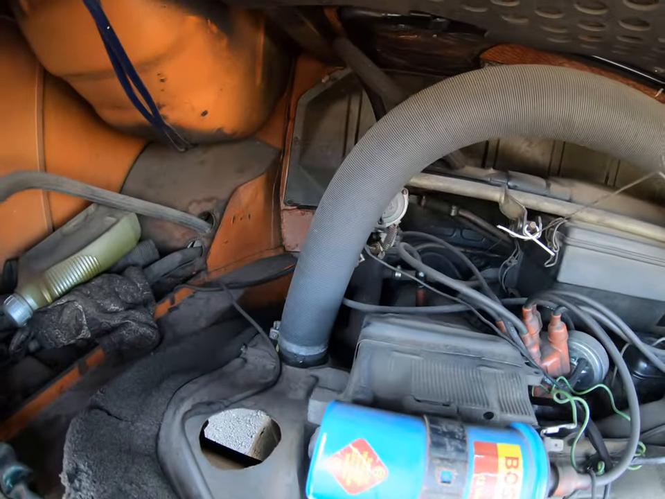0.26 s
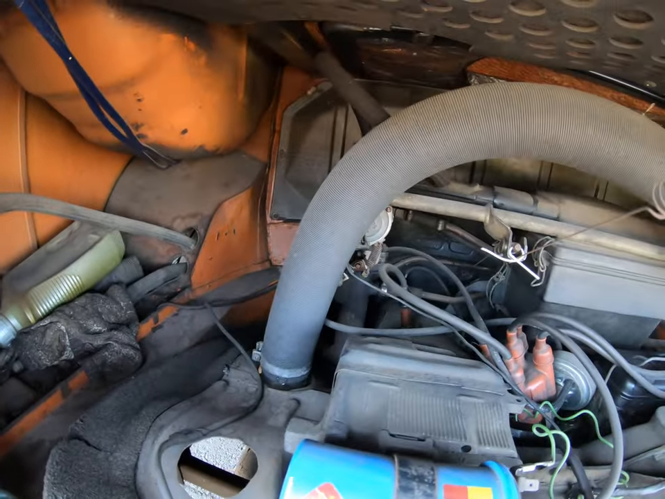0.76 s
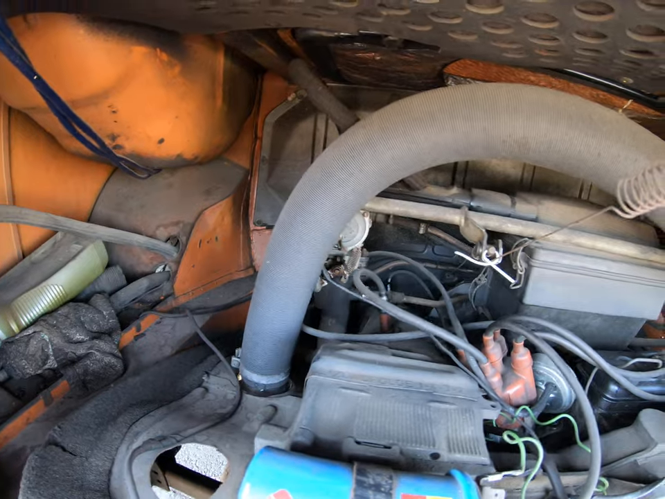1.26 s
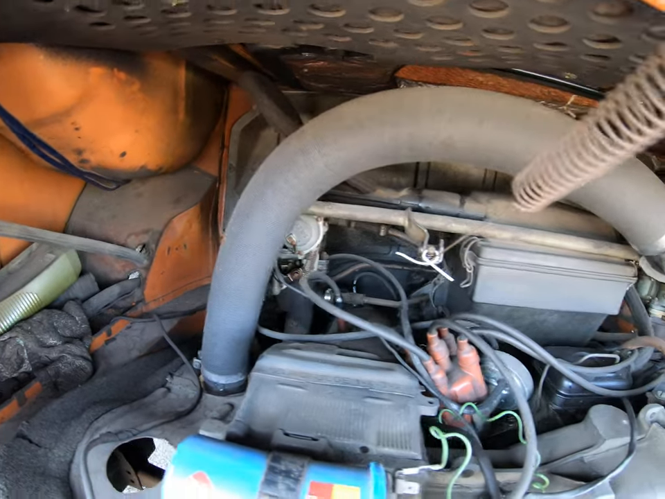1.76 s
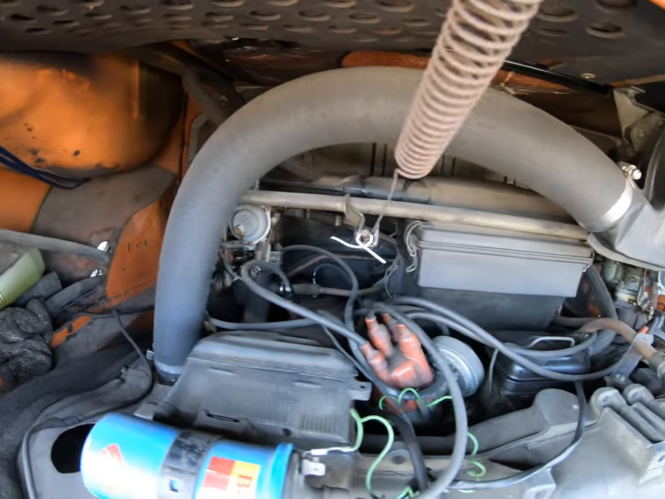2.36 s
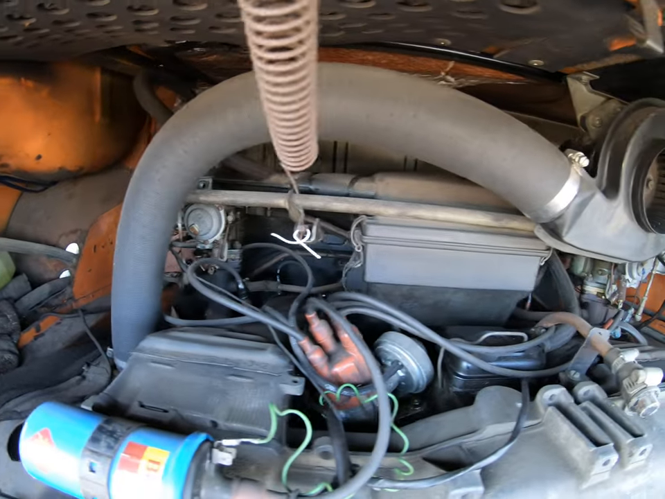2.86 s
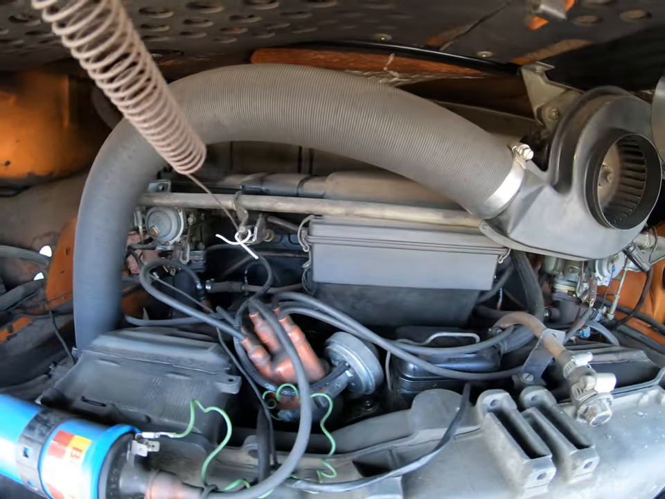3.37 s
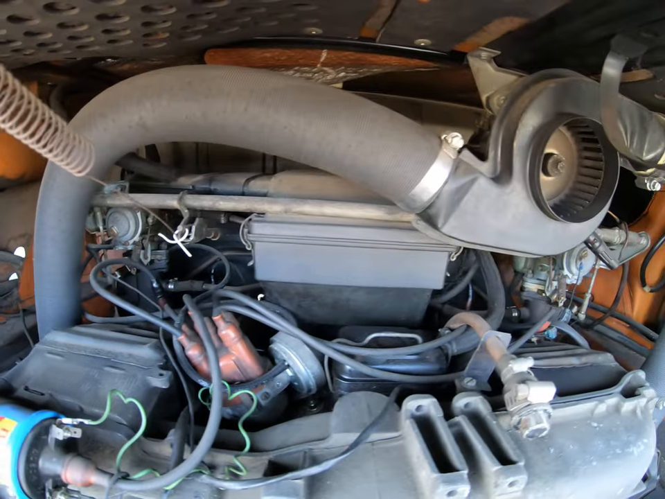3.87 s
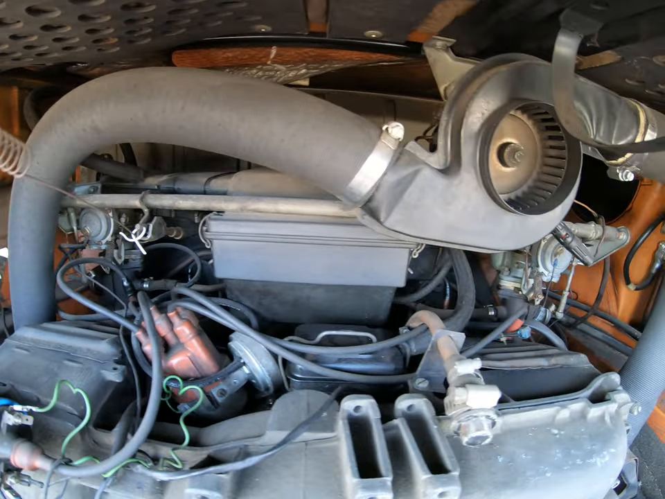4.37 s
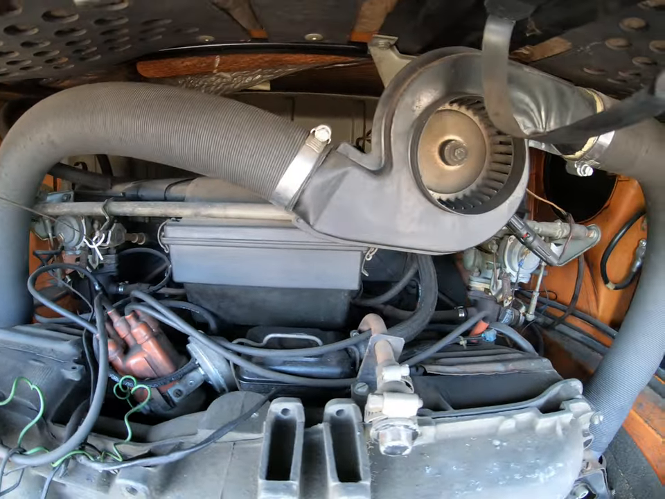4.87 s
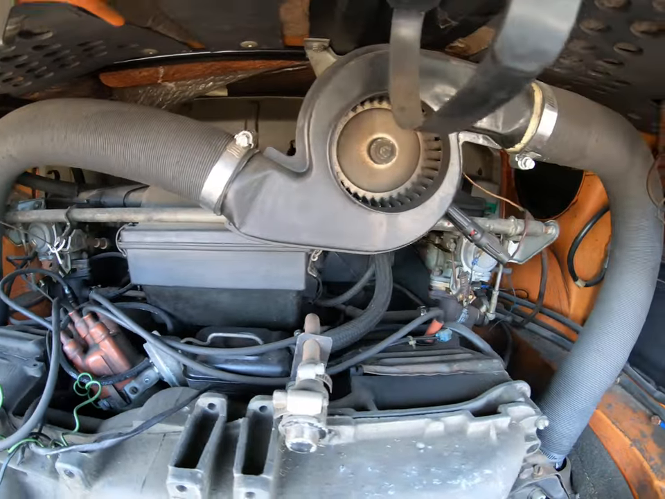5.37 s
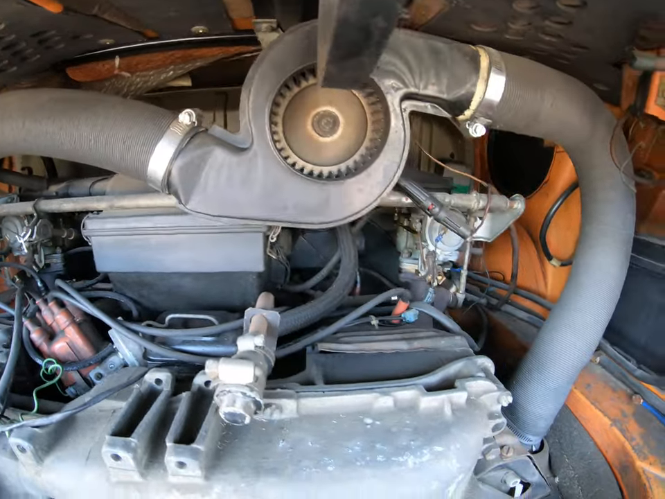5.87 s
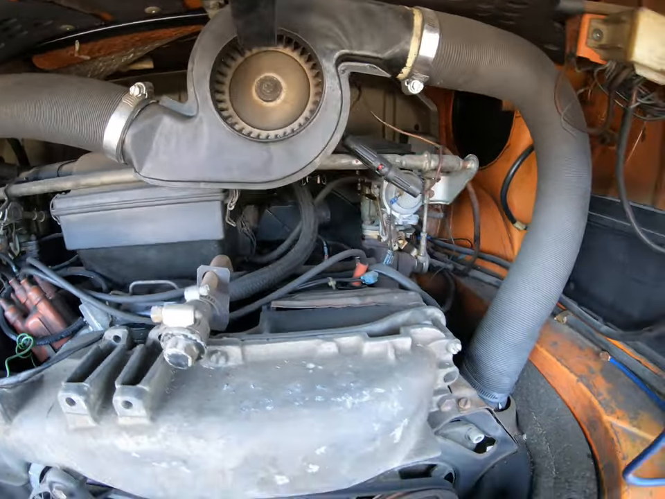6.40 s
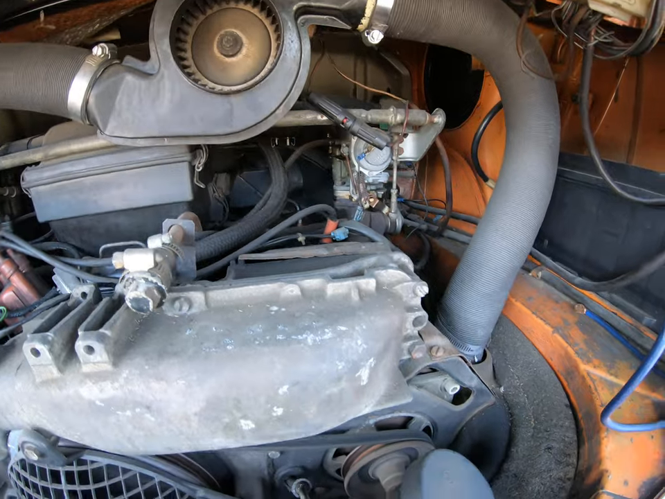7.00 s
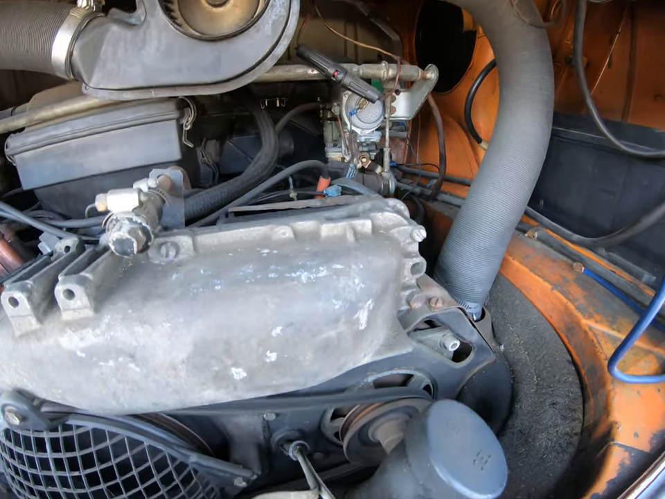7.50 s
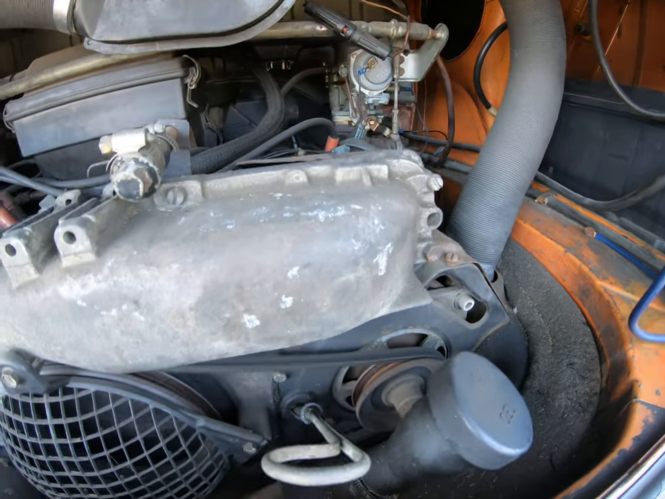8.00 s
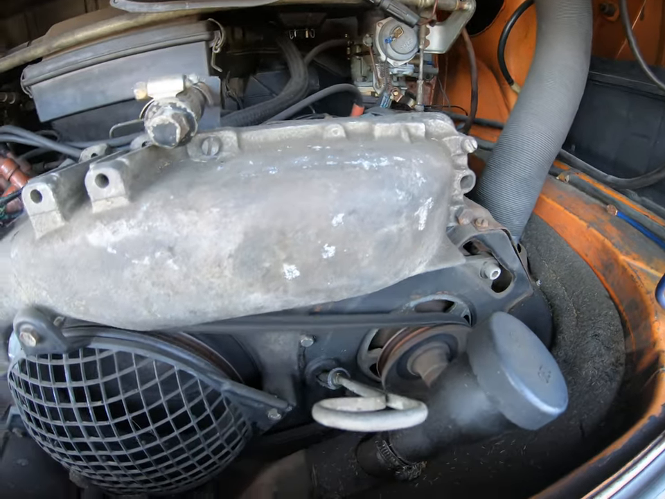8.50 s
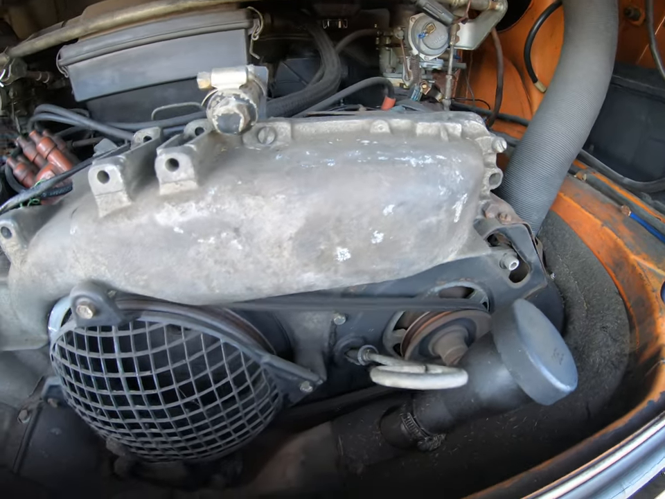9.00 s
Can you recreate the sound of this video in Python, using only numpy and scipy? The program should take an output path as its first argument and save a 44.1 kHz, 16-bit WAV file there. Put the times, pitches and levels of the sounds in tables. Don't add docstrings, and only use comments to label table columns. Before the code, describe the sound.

Continuous close idle in an open engine bay: rounded exhaust and intake pulses throb quickly, with rumbling gas flow behind. Valve gear clatters and ticks in a repeating pattern, while a bladed cooling fan hums and air hisses above. The microphone pans slowly past the blower, the fan tone rising modestly midway, then settles over the far side with brighter ticking. No revving or stopping.

```python
import sys
import numpy as np
from scipy import signal
from scipy.fft import rfft, irfft
from scipy.io import wavfile
from scipy.ndimage import uniform_filter1d, map_coordinates

SR = 44100
rng = np.random.default_rng(int(sys.argv[2]) if len(sys.argv) > 2 else 0)


def output_pcm(signal):
    pcm = np.clip(np.atleast_2d(signal).T, -1, 1) * 32767
    wavfile.write(sys.argv[1], SR, np.round(pcm).astype(np.int16))


def linear_from_db(decibels):
    return 10 ** (np.asarray(decibels, float) / 20)


N = 407925
STEP = 64


def in_time(rows):
    time_s, *columns = np.transpose(rows)
    return [np.interp(np.arange(N) / SR, time_s, column) for column in columns]


def at_hz(points, hz):
    point_hz, value = np.transpose(points)
    return np.interp(np.log(hz), np.log(point_hz), value)


def drift(rate_hz):
    knots = rng.standard_normal(int(N / SR * 2 * rate_hz) + 5)
    return map_coordinates(knots, [np.linspace(1, len(knots) - 2, N // STEP + 1)], order=3)


def held(slow):
    return slow.repeat(STEP)[:N]


def panned(x, pan_db):
    return x * linear_from_db(pan_db / 2 * np.array([[1], [-1]]))


def crossing(across, near, far):
    return near + (far - near) * across


# time in seconds, four-stroke cycles per second.
SPEED = [(0, 12.846), (.63, 13.04), (.93, 12.974), (2.61, 13.033), (2.92, 13.099), (3.33, 13.231),
         (3.92, 13.204), (4.25, 13.113), (4.67, 13.103), (5.29, 13.327), (5.55, 13.25), (5.96, 13.28),
         (6.29, 13.241), (6.82, 13.35), (7.23, 13.266), (8.21, 13.434), (8.8, 13.31), (9.25, 13.37)]
START_CYCLES = -.0696


def crank():
    return START_CYCLES + np.cumsum(in_time(SPEED)[0]) / SR


# crank degrees, peak in dB, width in degrees.
PULSES = [
    (41.5, -17.3, 14.9),
    (83.1, 4.5, 58.7),
    (161.9, -0.7, 24.8),
    (229.2, 5.1, 30.9),
    (309.2, 3.5, 34.8),
    (408.2, -2.6, 23.5),
    (455.1, -5.3, 19.6),
    (577.6, -8.4, 18.1),
    (663.2, -1.6, 24.6),
]


def gas_pulses(cycles):
    run_in_samples = 8192
    before = np.arange(run_in_samples, 0, -1) * SPEED[0][1] / SR
    run_in = np.r_[cycles[0] - before, cycles] + 3
    uneven = linear_from_db(0.29 * rng.standard_normal((int(run_in[-1]) + 2, len(PULSES))))
    pressure = 0
    for k, (degrees, peak_db, width_deg) in enumerate(PULSES):
        turns = run_in - degrees / 720 + .5
        off_peak_deg = (turns % 1 - .5) * 720
        hump = np.exp(-.5 * (off_peak_deg / width_deg) ** 2)
        pressure = pressure + linear_from_db(peak_db) * uneven[turns.astype(int), k] * hump
    radiated = signal.sosfilt(signal.butter(6, 37, "high", fs=SR, output="sos"), pressure)
    pipe_hz, pipe_gain = 159, .27
    pipe = signal.lfilter(*signal.iirpeak(pipe_hz, 9, fs=SR), radiated)
    return (radiated + pipe_gain * pipe)[run_in_samples:]


def tone(cycles, multiple, level_db, lag_rad, wobble_rad):
    phase = 2 * np.pi * (multiple * cycles + rng.random()) + wobble_rad * held(drift(2.2))
    return np.sqrt(2) * linear_from_db(level_db) * np.sin(phase - lag_rad / 2 * np.array([[1], [-1]]))


# multiple of the cycle rate, highest rms in dB,
# loudest at seconds, loss in dB per second away.
ORDERS = [(14, -34, 2.8, .4), (15, -41, 9, 1), (16, -33.5, 8.3, .1), (17, -37, 8.3, .8), (44, -39, 4.6, .7),
          (52, -35, 6.2, 3.5), (53, -40, 6.6, 1.5), (55, -34, .6, 1.5), (56, -31.5, 5.1, 3),
          (54, -40, 6, 2.5), (75, -41, 1.8, 3), (59, -37, 5.4, 5), (64, -38.5, 5.4, 5), (68, -37, 4.7, 4),
          (69, -40, 2.8, 2), (70, -40, 2.8, 1.5), (74, -38, 1.4, 4), (71, -42, 1.2, 2), (43, -40, 5, 1.5),
          (48, -41, 5, .5)]


def pipe_orders(cycles):
    time_s = np.arange(N) / SR
    out = 0
    for multiple, peak_db, at_s, loss in ORDERS:
        level_db = peak_db - loss * abs(time_s - at_s)
        out = out + tone(cycles, multiple, level_db, lag_rad=multiple / 60, wobble_rad=0.11)
    return out


# time in seconds, way across the bay 0-1, fan tone in dB.
WALK = [
    (0, 0.07, -35),
    (.4, 0.2, -32),
    (1.1, 0.2, -32),
    (3.0, 0.38, -28),
    (4.9, 0.5, -28),
    (6.3, 0.98, -31),
    (7.4, 0.9, -32),
    (8.3, 0.93, -34),
    (9.25, 0.83, -32.5),
]


def fan(cycles, across, fan_db):
    blades = tone(cycles, 40, fan_db + 0.1, lag_rad=0.24, wobble_rad=0.096)
    return panned(blades, crossing(across, -0.5, 5))


# crank degrees, dull knock in dB, bright tick in dB,
# top sizzle in dB, fading in degrees.
VALVES = [
    (55, 5.5, 9.5, 1.5, 46),
    (191, 1, 1, -8, 36),
    (376, -19, 1, 2.5, 70),
    (434, 5.5, 5.5, 6.5, 41),
    (602, 3, 2.5, -6, 28),
]


def contacts(cycles, column):
    power, angle = 1, np.arange(720)
    for row in VALVES:
        since = (angle - row[0]) % 720
        power = power + linear_from_db(2 * row[column]) * (1 - np.exp(-since / 7.0)) * np.exp(-since / row[4])
    degrees = cycles % 1 * 720
    return np.sqrt(power / np.mean(power))[degrees.astype(int)]


def repeating_noise(cycles, memory, size=2048):
    rows = rng.standard_normal((2, int(cycles[-1]) + 203, size))
    rows = signal.lfilter([np.sqrt(1 - memory ** 2)], [1, -memory], rows, axis=1)[:, 200:]
    orders = rfft(rows)
    rows = irfft(orders * (np.sqrt(size) / np.abs(orders)) ** .15, size)
    flat = rows.reshape(2, -1)[:, ((cycles + 1) * size).astype(int)]
    return flat * np.sqrt(SR / size / 12.1)


# Hz, share of power alike each cycle.
REPEATING = [(250, 0.46), (800, 0.68), (1500, 0.81), (3000, 0.84), (4300, 0.23), (6000, .03)]
# Hz, left-right likeness.
LIKENESS = [(60, 0.94), (130, 0.87), (290, 1), (640, 0.58), (1410, 0.15), (3100, 0.77), (6820, 0.19),
            (15000, -0.3)]


def bands(low_hz, high_hz, steps, level_db, free, locked, patchy_db):
    out, edges = 0, np.geomspace(low_hz, high_hz, steps + 1)
    for k, (low, high) in enumerate(zip(edges, edges[1:])):
        hz = np.sqrt(low * high)
        source = free[k % 2]
        if locked is not None:
            share = np.clip(at_hz(REPEATING, hz), 0, 1)
            source = np.sqrt(1 - share) * source + np.sqrt(share) * locked[k % 2]
        mid, side = signal.sosfilt(signal.butter(2, [low, high], "band", fs=SR, output="sos"), source)
        alike = np.clip(at_hz(LIKENESS, hz), -1, 1)
        gain = held(linear_from_db(level_db(hz) + patchy_db * drift(.8)))
        out = out + gain * (np.sqrt(1 + alike) * mid + np.sqrt(1 - alike) * side * [[1], [-1]])
    return out / uniform_filter1d(np.mean(out ** 2, axis=0), SR) ** .5


# Hz, dB per Hz.
CLATTER = [(230, 2), (300, -3), (460, -7), (700, -3.5), (1150, -7), (2350, -9), (2850, -5.5), (5200, -11.5)]
# Hz, lift in dB, strongest at seconds, reach in seconds, width in octaves.
BAY_WAVES = [(374, 3.5, 5.4, 1.3, 0.29), (545, 4, 5.5, 0.85, .15), (732, 4, 0.5, 0.84, 0.057),
             (810, 7, 5.56, 0.56, 0.23), (960, 2, 1.4, 1.2, 0.062), (900, -3, 8, 1.2, 0.13),
             (1110, -8, 9.5, 0.41, 0.043), (1240, 5.5, 8.5, 1.06, 0.32), (1170, -1.5, 0.62, 0.51, 0.1),
             (1600, -1, 6.4, 1, 0.068), (1750, 3, 0.17, 0.28, 0.12), (1900, -7.5, 2.2, 1.15, 0.078),
             (1990, 3, 8.6, 2.6, 0.14), (2590, 1.5, 7.8, 1.7, 0.14), (2760, 1.5, 1.6, 1.4, 0.065),
             (3350, 0.5, 4.7, 0.74, 0.45), (3180, -5, 7.6, 0.27, 0.11), (4170, 0.5, 0.4, 0.45, 0.24),
             (4780, -1, 2.6, 0.21, 0.061)]


def bay_colour(hz):
    time_s, level_db = np.arange(0, N, STEP) / SR, at_hz(CLATTER, hz)
    for wave_hz, lift_db, at_s, reach_s, octaves in BAY_WAVES:
        away = ((time_s - at_s) / reach_s) ** 2 + (np.log2(hz / wave_hz) / octaves) ** 2
        level_db = level_db + lift_db * np.exp(-.5 * away)
    return level_db


def clatter(cycles, across, free):
    locked = [repeating_noise(cycles, 0.98), repeating_noise(cycles, 0.94)]
    knock = contacts(cycles, 1) * bands(231.2, 2302, 22, bay_colour, free, locked, patchy_db=0.43)
    rattle = contacts(cycles, 2) ** .25 * bands(2300, 5200, 14, bay_colour, free, locked, patchy_db=1.1)
    return linear_from_db(-24) * panned(knock, crossing(across, -4.5, 2.1)) + linear_from_db(-27) * rattle


# Hz, struck at crank degrees, peak in dB, heard from seconds, until seconds.
ROCKERS = [(4750, 50, -30, -1, 1.5), (4750, 50, -30.5, 3.2, 5), (4750, 45, -27.5, 5.9, 10),
           (4060, 65, -21.5, 2.05, 2.95), (3720, 70, -23.5, 3.8, 4.6), (3720, 428, -25.5, 3.8, 4.6),
           (3760, 68, -23.5, 5, 7.1), (3720, 435, -24.5, 5.8, 7.1), (3320, 440, -24, 4.6, 6.4),
           (2850, 200, -23.5, .4, 2.2), (2850, 80, -25.5, .4, 2.2), (2800, 430, -25.5, .2, 2.2),
           (2880, 570, -26.5, .2, 2.2), (3000, 270, -25.5, 2, 3.1), (4270, 55, -25.5, 6.5, 10),
           (3600, 440, -23.5, 8, 10), (2700, 570, -25.5, 8, 10), (4090, 65, -23.5, 8, 9),
           (3200, 430, -25.5, 7.7, 10), (3550, 60, -26.5, .5, 2), (4270, 450, -27, 6.2, 10),
           (4200, 75, -26, 3.1, 4.8), (2900, 310, -24, 7.7, 10), (3600, 65, -27, 7.7, 10)]
# Hz, struck at crank degrees, peak in dB, heard from seconds, until seconds.
COVERS = [(2030, 590, -28, 5.9, 10), (1300, 45, -27, 7.8, 10), (1300, 600, -27, 7.8, 10),
          (960, 630, -21.5, -1, 3.4), (960, 270, -25, -1, 3.4), (1430, 250, -28, -1, 2.4),
          (800, 630, -21.5, 4.4, 6.1), (1050, 200, -25, 4.9, 6.1), (1265, 95, -23.5, 2.9, 5.9),
          (1520, 610, -25, 1.4, 3), (1680, 630, -28, -1, 1.4), (2060, 75, -28, 4.6, 7.5),
          (1360, 590, -28, 6.2, 7.8), (2000, 390, -30, 6.2, 10)]


def ticks(cycles, pan_db):
    fade_s, uneven_db, contact_q = .25, 1.1, 4
    out = np.zeros(N)
    turns = np.arange(int(cycles[-1]) + 1)
    for parts, t60_s in ((ROCKERS, .033), (COVERS, .06)):
        for hz, degrees, peak_db, start_s, end_s in parts:
            first, last = max(int((start_s - fade_s) * SR), 0), min(int((end_s + fade_s) * SR), N)
            slack = rng.integers(0, 10, len(turns))
            at = np.searchsorted(cycles, turns + degrees / 720) + slack
            heard = np.clip(np.minimum(at / SR - start_s, end_s - at / SR) / fade_s + .5, 0, 1)
            strength = heard * linear_from_db(peak_db + uneven_db * rng.standard_normal(len(at)))
            inside = (at >= first) & (at < last)
            clicks = np.full(last - first, 1e-18)
            clicks[at[inside] - first] = strength[inside]
            r, w = linear_from_db(-60 / (t60_s * SR)), 2 * np.pi * hz / SR
            ring = signal.lfilter([0, np.sin(w)], [1, -2 * r * np.cos(w), r * r], clicks)
            out[first:last] += 1.2 * signal.lfilter(*signal.iirpeak(hz, contact_q, fs=SR), ring)
    return panned(out, pan_db)


# Hz, dB per Hz.
HISS = [(2650, -30), (4500, 0), (4790, -11), (5280, -6.5), (6390, -5), (7270, -7), (9030, -17),
        (10200, -18.5), (11500, -36), (13800, -32.5), (15400, -66)]


def air_hiss(cycles, across, pan_db, free):
    def air(hz):
        return at_hz(HISS, hz)
    hiss = contacts(cycles, 2) * bands(5000, 8800, 8, air, free, None, patchy_db=.7)
    sizzle = contacts(cycles, 3) * bands(9090, 14100, 6, air, free[::-1], None, patchy_db=2.2)
    both = hiss + panned(linear_from_db(-13) * sizzle, 3.0)
    return panned(linear_from_db(crossing(across, -32, -35.5)) * both, pan_db)


# Hz, dB per Hz.
RUMBLE = [(20, -22), (40, -34), (95, 7), (150, -9.5), (300, -2), (380, -14)]


def flow_rumble(free):
    return linear_from_db(-32) * bands(18.2, 385.0, 8, lambda hz: at_hz(RUMBLE, hz), free[::-1], None, patchy_db=5.0)


def scene():
    cycles = crank()
    across, fan_db = in_time(WALK)
    hiss_pan_db = crossing(across, -0.8, 2)
    free = rng.standard_normal((2, 2, N))
    engine = gas_pulses(cycles) + pipe_orders(cycles) + fan(cycles, across, fan_db)
    valve_gear = clatter(cycles, across, free) + ticks(cycles, hiss_pan_db / 2)
    return engine + valve_gear + air_hiss(cycles, across, hiss_pan_db, free) + flow_rumble(free)


def top_cut(x):
    return signal.sosfilt(signal.butter(12, 15750, fs=SR, output="sos"), x)


def record(dry):
    mix = dry - .0022
    return top_cut(mix)


dry = scene()
out = record(dry)
output_pcm(out)
```